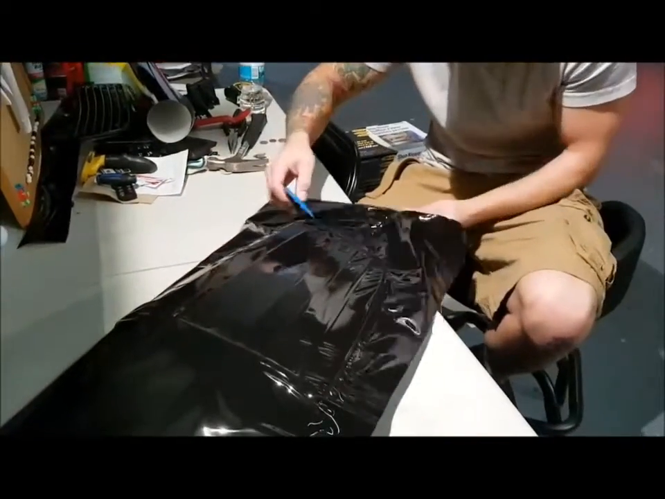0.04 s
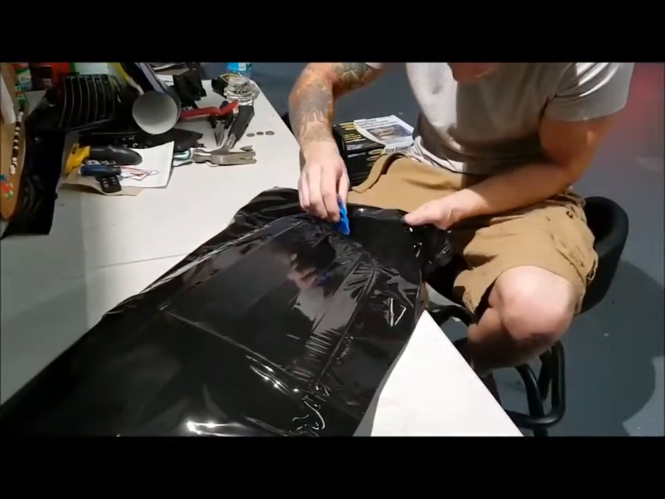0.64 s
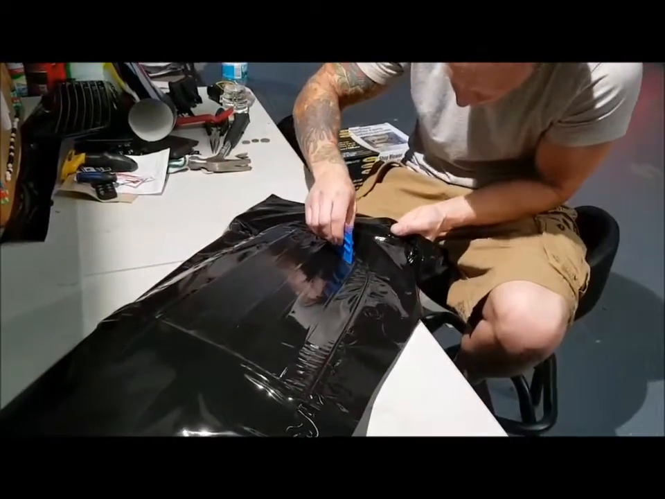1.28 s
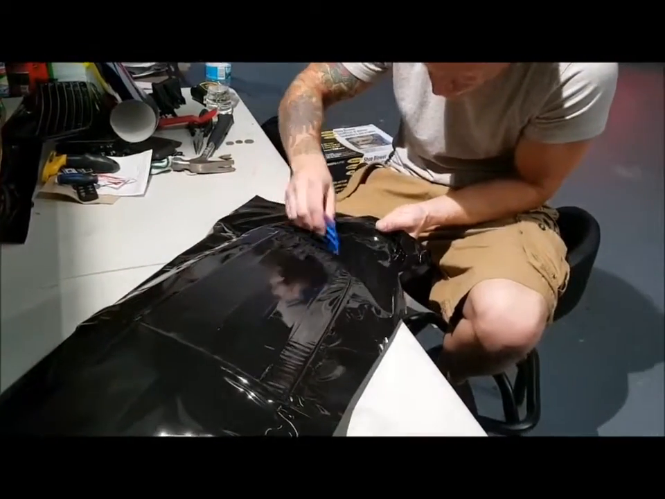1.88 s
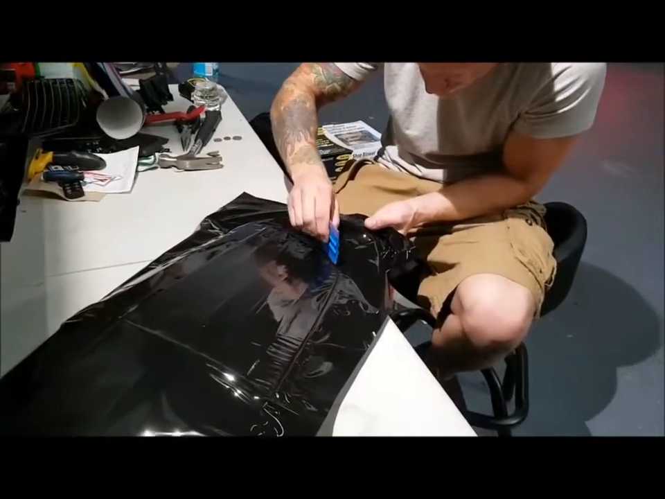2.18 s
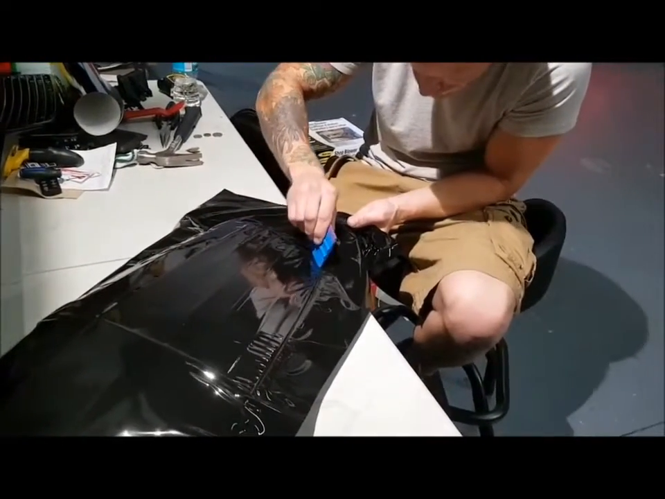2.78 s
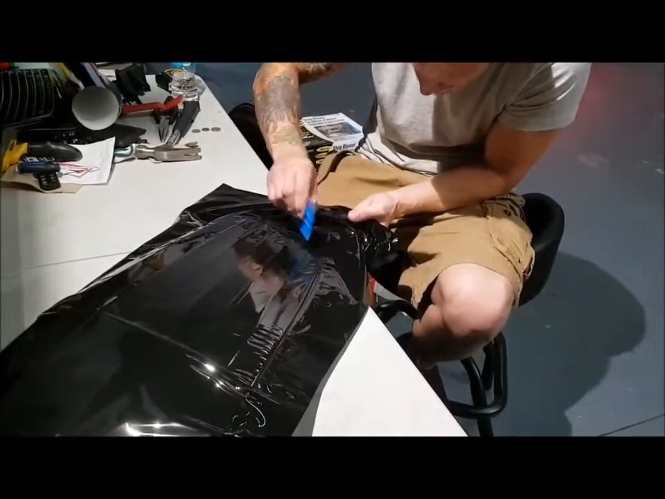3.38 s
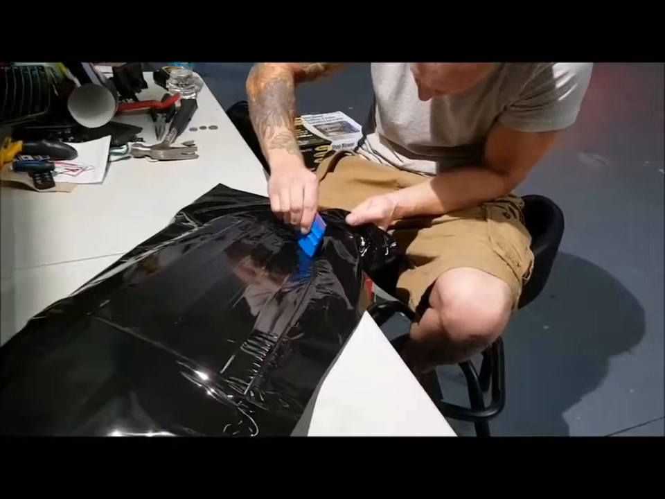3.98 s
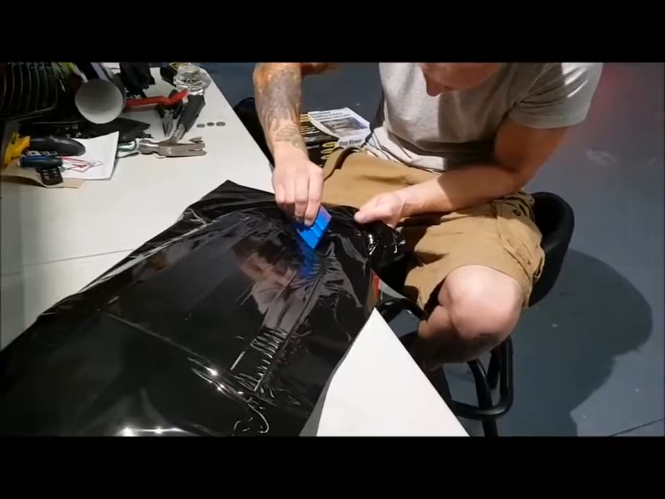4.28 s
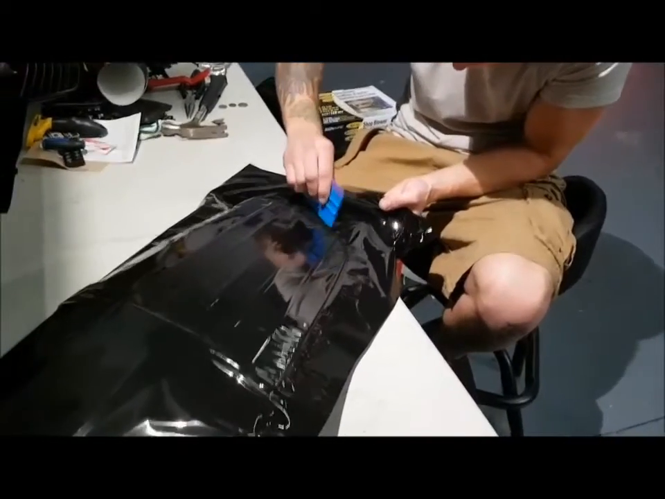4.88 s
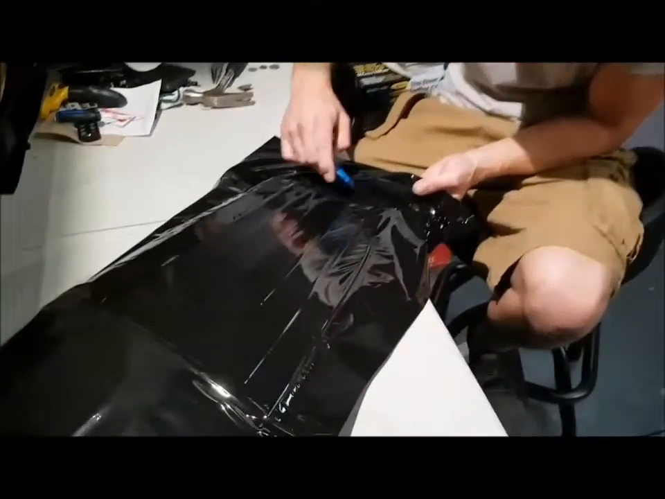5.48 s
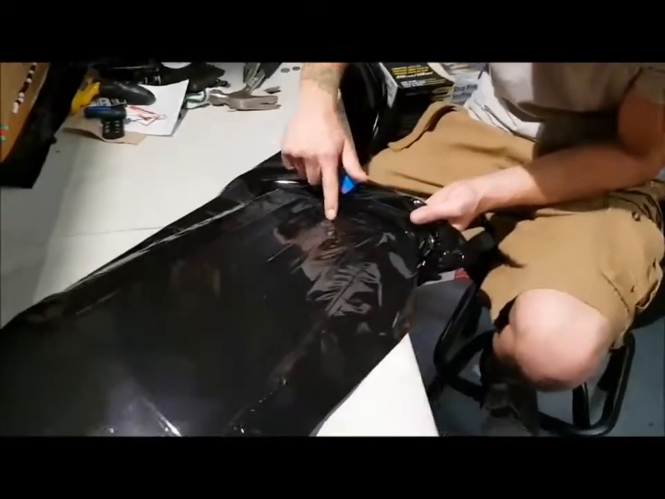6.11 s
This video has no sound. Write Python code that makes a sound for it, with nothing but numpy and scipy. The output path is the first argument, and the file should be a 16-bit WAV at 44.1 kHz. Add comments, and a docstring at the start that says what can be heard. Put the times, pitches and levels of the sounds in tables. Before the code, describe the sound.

Vinyl film hisses and rustles under a scraping squeegee in a garage, popping loudly once among small clicks and dull knocks.

```python
"""A plastic squeegee works loose vinyl film into the recess of a car grille, in a garage.
Countless tiny slips make the blade drag, hiss and rasp; on the hardest stroke it sticks and judders.
Once the taut film buckles into the recess with a loud pop, and the room rings. There are crisp snaps,
dull taps and a tiny squeak; fingers glide, the loose sheet rustles, and the hollow panel knocks,
bumps and hums under the hands. Low ventilation noise lies beneath it all."""
import sys
import numpy as np
from scipy import signal
from scipy.fft import rfft, irfft, next_fast_len
from scipy.io import wavfile
from scipy.ndimage import uniform_filter1d

SR = 44100
rng = np.random.default_rng(int(sys.argv[2]) if len(sys.argv) > 2 else 0)


def wav_out(sig):
    """Save sig, one row per channel (or a flat mono array), as 16-bit PCM at SR to the path in sys.argv[1]."""
    wavfile.write(sys.argv[1], SR, np.round(np.clip(np.atleast_2d(sig).T, -1, 1) * 32767).astype(np.int16))


N = 275617

# Squeegee strokes, speeding up and slowing again. Each row: start, peak and end in seconds,
# then the relative levels of blade drag, film hiss and panel rumble in dB.
STROKES = [(-.3, .1, 0.76, -56, -58, -51.5), (.45, .53, 0.95, -58, -53.5, -73),
           (.5, .8, 1.29, -45.5, -60.5, -50), (1.45, 1.54, 2.2, -57, -59, -67),
           (1.7, 2.3, 2.87, -58.5, -62, -52), (3.54, 4.14, 4.58, -51.5, -52, -51.5),
           (4.15, 4.185, 4.26, -48, -50.5, -67), (4.28, 4.33, 4.4, -61, -58.5, -71),
           (4.3, 4.6, 5.6, -69.5, -73, -56), (5.2, 5.95, 6.5, -59, -59, -54)]


def rubbing():
    """Countless tiny slips: the dull drag of the blade, the hiss of sliding film, its fine crinkle."""
    # Four tone colours. Each row: frequency in Hz, relative level in dB.
    drag_colour = [(120, -10.5), (230, -1), (370, 5.5), (490, -6), (800, 1), (1100, -2), (1400, -3),
                   (1900, -6), (2500, -8), (5000, -53), (15000, -60)]
    hiss_colour = [(400, -26.5), (1200, -5), (1550, -2.5), (1950, -0.5), (2550, 4.5), (3400, -0.5),
                   (4500, 0), (6000, -5.5), (7500, -9), (9000, -24.5), (15000, -63.5)]
    crinkle_colour = [(2000, -32), (6000, 4.5), (9000, -8), (12500, 3.5), (15000, -12)]
    wrinkle_colour = [(400, -13), (1500, 1), (3000, -2), (5000, -4.5), (7000, -6.5), (9000, -25),
                      (15000, -22)]
    # The film is gathered or stretched. Each row: start, peak and end in seconds, level in dB.
    stretches = [(-.2, .13, 1.6, -70), (.45, .51, 0.63, -58), (1.41, 1.55, 1.7, -58.5),
                 (1.95, 2.2, 2.4, -73), (3.5, 3.72, 4, -75), (4.06, 4.18, 4.27, -65), (5.6, 6.1, 7.7, -67)]
    # The hands never quite rest, so each layer keeps a floor between strokes.
    pressing = np.hypot(swell(STROKES, column=3, law=0.41), gain_of(-63))
    sliding = np.hypot(swell(STROKES, column=4, law=0.73), gain_of(-73.5))
    creasing = np.hypot(swell(stretches), sliding * gain_of(-25))
    creasing = np.hypot(creasing, gain_of(-78.5))
    drag = tinted(pair(grains(5000, 1.56)), drag_colour) * pressing * waver(60, 1.9)
    hiss = tinted(pair(grains(12000, 0.57)), hiss_colour) * sliding * waver(35, 1.25) * gain_of(1.12)
    crinkle = tinted(grains(6000, 0.6), crinkle_colour) * creasing * waver(70, 1.1)
    wrinkles = tinted(grains(120, 2.0), wrinkle_colour) * creasing * gain_of(-1.5)
    return drag + hiss + crinkle + wrinkles


def rasping(pocket_hz=636, climb_octaves=1.56):
    """Coarse catches along the groove ring the panel, the blade and a shrinking pocket of air."""
    # Each row: start, peak and end in seconds, relative level in dB.
    scrapes = [(0.502, 0.88, 1.3, -54), (1.958, 2.324, 2.87, -61.5), (3.694, 4.116, 4.45, -53.5)]
    # Panel and blade resonances. Each row: frequency and width in Hz, relative level in dB.
    modes = [(280, 58, -10), (391, 70, -3.5), (850, 140, -6), (2450, 400, -12), (4450, 910, -8.5)]
    out, t = np.zeros((2, N)), np.arange(N) / SR
    catches = pair(grains(700, 3.7)) * waver(45, 1.6)
    body = sum(gain_of(db) * resonate(catches, hz, width) for hz, width, db in modes)
    for scrape in scrapes:
        progress = np.interp(t, [scrape[0], scrape[2]], [0, 1])
        pocket = resonate(catches, pocket_hz * 2 ** (climb_octaves * progress), width_hz=610)
        out += (pocket + body) * swell([scrape])
    return out


def judder(start_hz=640, octaves_per_s=6.5, t60=0.038, q=0.74):
    """The blade sticks and slips on tightening film, so the pitch climbs; each slip rings briefly."""
    # Each row: start in seconds, relative level in dB.
    slips = [(.88, -42), (0.897, -37.5), (0.916, -37), (.935, -30), (.957, -28), (.975, -25.5),
             (.9935, -25.5), (1.017, -29)]
    first, hardest = slips[0][0], max(db for s, db in slips)
    hits = []
    for s, db in slips:
        hz = start_hz * 2 ** (octaves_per_s * (s - first))
        edge_db = -30.5 + 1.6 * (db - hardest)  # harder slips have more bite
        hits.append((s, db, hz, edge_db, 0, t60, q))
    out = flicks(hits, body_trim_db=-1.5, edge_trim_db=-8, direct=0.43, lowpass_hz=2130, edge_length=0.8)
    for s, db in slips:
        for hz, ring_db, ring_t60 in (740, -12.5, 0.016), (1162, -12, 0.036):
            detune = 1 + 0.055 * rng.standard_normal()
            add(out, s, note(hz * detune, ring_t60, db + ring_db))
    return out


def knocks(tick_hz=1750, tick_t60=0.066, tick_q=0.82):
    """The blade taps the panel through the film: a dull tick and always the same hollow note."""
    # Each row: start in seconds, relative level in dB.
    taps = [(.068, -32.5), (1.3, -39), (2.559, -31.5), (2.645, -47)]
    hits = [(s, db, tick_hz, db - 7.5, 0, tick_t60, tick_q) for s, db in taps]
    out = flicks(hits, body_trim_db=-6.5, edge_trim_db=-10, direct=0.11, lowpass_hz=3340, edge_length=1.7)
    for s, db in taps:
        add(out, s, note(hz=512, t60=0.048, db=db - 5))
    return out


def pop(rise_s=0.00031):
    """The film buckles into the recess in quick cracking steps, and the taut sheet rings."""
    # Each row: start in seconds, relative level in dB.
    steps = [(1.5598, -7.5), (1.562, -2), (1.564, 2), (1.5654, -2), (1.574, -6.5)]
    # Each row: frequency in Hz, relative level in dB.
    crack_colour = [(80, -19.5), (230, -10), (340, -20.5), (520, -10.5), (800, -14), (1300, -6.5),
                    (2050, 0), (2900, -12), (4200, -11.5), (6000, -14.5), (8500, -29), (14500, -31.5)]
    # Each row: frequency in Hz, relative level in dB, seconds to fall 60 dB.
    film_modes = [(800, -9.5, 0.044), (1120, -10.5, 0.11), (1170, -10, 0.048), (1407, -8.5, 0.1),
                  (1690, -0.5, 0.031), (1908, 1.5, 0.034), (2198, 2, 0.041), (2490, -1.5, 0.043),
                  (2810, -6, 0.046), (3460, -9.5, 0.023), (4340, -6.5, 0.026), (4330, -16.5, .03)]
    out, t = np.zeros((2, N)), np.arange(8192) / SR
    for s, db in steps:
        pulse, hz = burst(t60=0.019, direct=0.19)
        crack = causal(pulse, gain_of(read(crack_colour, hz)))
        add(out, s, at_level(crack, db - 17.5))
    phases = rng.uniform(0, 2 * np.pi, (len(film_modes), 1, 1))
    phases = phases + rng.normal(0, 0.82, (len(film_modes), 2, 1))  # stereo width
    ring = sum(gain_of(db - 60 * t / t60) * np.sin(2 * np.pi * hz * t + phase)
               for (hz, db, t60), phase in zip(film_modes, phases))
    attack = 1 - np.exp(-t / rise_s)
    add(out, steps[1][0], at_level(ring * attack, -14))
    return out


def snaps_and_taps(ref_db=-20, ref_t60=0.025, halving_db=8.5):
    """Crisp snaps, a few dull taps and one tiny squeak, each ringing briefly; louder ones are shorter."""
    # Each row: start in seconds, body level in dB, body pitch in Hz, body Q, edge level in dB,
    # ring pitch in Hz, ring level in dB, top-end fizz in dB. All levels are relative.
    events = [(.025, -40, 1500, 1.6, -41.5, 1510, -50, 0), (.047, -40, 1800, 1.2, -46, 1780, -52, 5),
              (.1205, -43, 530, 1.3, -39.5, 440, -36, 6), (.1285, -38, 450, 1.7, -36.5, 980, -54, -1),
              (.176, -28, 1000, 0.58, -32, 1825, -28, 3), (0.2012, -30, 1550, 2.5, -32, 1455, -29, 0),
              (.32, -32.5, 1040, 0.64, -39.5, 2230, -36, 9), (.356, -30.5, 1310, 1.5, -37.5, 1740, -32, 9),
              (.381, -50, 2000, 1.2, -45, 2000, -49.5, 13), (.471, -33, 2400, 1.4, -47, 2274, -46, -1),
              (.497, -32, 1460, 0.64, -40, 1420, -57, 12), (.505, -28.5, 1940, 1.3, -33, 990, -49, 7),
              (0.54, -32.5, 1000, 1.4, -37, 1390, -46, 8),
              (1.1469, -22.5, 2740, 4.5, -27.5, 1320, -25.5, 1.5),
              (1.1504, -20, 1530, 0.69, -33, 1135, -29.5, 0),
              (1.1714, -18, 2370, 1.45, -24, 2250, -24.5, -17), (1.547, -33.5, 1090, 1.4, -42, 706, -37, 5),
              (2.211, -37.5, 2630, 3.9, -53, 1660, -45, 0), (3.21, -42.5, 1690, 0.74, -56, 1650, -54, -2.5),
              (3.687, -39, 1900, .8, -47, 2580, -47, -7), (4.281, -55, 2600, 1, -59, 8200, -48, 0),
              (5.099, -31, 660, 1.44, -63, 1120, -37, -10), (5.608, -32, 1900, 0.84, -38, 2310, -36.5, -6),
              (5.623, -41, 2500, 1, -54, 2310, -52, 0), (5.661, -36, 800, 0.9, -47, 1486, -42, -12)]
    hits = []
    for s, db, hz, q, edge_db, _, _, fizz_db in events:
        t60 = ref_t60 * 2 ** ((ref_db - db) / halving_db)
        hits.append((s, db, hz, edge_db, fizz_db, t60, q))
    out = flicks(hits, body_trim_db=-7, edge_trim_db=-3, direct=0.18, lowpass_hz=4000, edge_length=0.65)
    for s, *_, ring_hz, ring_db, _ in events:
        add(out, s, note(ring_hz, t60=0.039, db=ring_db - 11))
    return out


def flicks(hits, body_trim_db, edge_trim_db, direct, lowpass_hz, edge_length):
    """Each slip, tap or snap on the film rings one resonance and gives a crisp edge."""
    # Each row: frequency in Hz, relative level in dB.
    edge_colour = [(400, 0), (1500, 0.5), (2800, -1.5), (5000, 0.5), (7000, -12.5), (9000, -24.5),
                   (15000, -24)]
    out = np.zeros((2, N))
    for s, body_db, body_hz, edge_db, fizz_db, t60, q in hits:
        spike = direct * 0.032 / max(t60, 0.008)  # shorter hits put more into the first pulse
        pulse, hz = burst(t60 / np.sqrt(max(q / 2, 1)), spike)  # a sharp resonance adds its own decay
        detune = (hz + 1) / body_hz - body_hz / (hz + 1)
        body = causal(pulse, 1 / np.sqrt((1 + (q * detune) ** 2) * (1 + (hz / lowpass_hz) ** 4)))
        pulse, hz = burst(t60 * edge_length, spike)
        shelf_db = np.interp(hz, [3000, 8800], [0, fizz_db])
        edge = causal(pulse, gain_of(read(edge_colour, hz) + shelf_db))
        add(out, s, at_level(body, body_db + body_trim_db) + at_level(edge, edge_db + edge_trim_db))
    return out


def bumps(t60=0.11, rise_s=0.0052):
    """The hands bump the hollow panel: low, quickly damped swings with a weaker second mode."""
    # Each row: start in seconds, relative level in dB, pitch in Hz.
    thumps = [(0.299, -35.5, 95.4), (0.496, -40.5, 130), (1.007, -33.5, 205), (1.149, -38, 210),
              (1.171, -43.5, 331.4), (1.562, -23.5, 108.7), (1.646, -37, 126), (1.901, -38, 90),
              (3.606, -40, 140), (4.029, -43, 132), (4.199, -43, 154), (4.481, -47, 199.3),
              (4.814, -47.5, 248), (5.066, -33, 91.7), (5.101, -48.5, 374), (5.306, -37, 108),
              (5.669, -31.5, 114), (5.851, -46.5, 252), (5.913, -34, 156), (6.085, -36.5, 112)]
    out, t = np.zeros((2, N)), np.arange(SR // 3) / SR
    attack = 1 - np.exp(-t / rise_s)
    for s, db, hz in thumps:
        swing = np.sin(2 * np.pi * hz * t) + 0.3 * np.sin(2 * np.pi * hz * 1.39 * t)
        decay = gain_of(db + 1 - 60 * t / t60)
        add(out, s, np.tile(swing * attack * decay, (2, 1)))
    return out


def finger_glides():
    """Fingers glide over the film in a bright whisper of fine, unsteady slips."""
    # Each row: start, peak and end in seconds, level in dB.
    glides = [(1.412, 1.425, 1.64, -50.5), (3.195, 3.215, 3.4, -63), (3.6, 4.1, 4.1, -62),
              (5.72, 6.07, 6.44, -57.5)]
    # Each row: frequency in Hz, relative level in dB.
    colour = [(500, -12), (1500, -4.5), (1850, -6), (2100, -3.5), (2500, -1.5), (3400, -10.5), (4200, -5),
              (4600, -1.5), (5400, -6), (6200, -12), (7300, -11), (9000, -21), (15000, -20.5)]
    return tinted(pair(grains(9000, 0.64)), colour) * swell(glides) * waver(40, 2.3)


def sheet_flexing():
    """The loose sheet flexes with a low, uneven rustle."""
    # Each row: start, peak and end in seconds, level in dB.
    flexes = [(1.8, 1.98, 2.14, -54), (3.75, 4.03, 4.06, -51), (4.465, 4.487, 4.57, -52),
              (4.8, 4.825, 5, -56), (5.29, 5.315, 5.37, -51.5), (5.65, 5.675, 5.72, -54),
              (5.8, 5.85, 5.99, -57), (6.02, 6.08, 6.2, -50), (1.935, 1.955, 1.985, -39.5)]
    # Each row: frequency in Hz, relative level in dB.
    colour = [(90, -20.5), (160, -11), (230, 3.5), (300, -3), (375, -2.5), (500, -14), (900, -16),
              (3000, -51)]
    return tinted(pair(grains(9000, 0.64)), colour) * swell(flexes) * waver(40, 3.5)


def panel_hum():
    """A slow, even stroke keeps a low note of the panel humming."""
    # Each row: start, peak and end in seconds, level in dB.
    hums = [(2.03, 2.27, 2.47, -52), (3.6, 4.0, 4.45, -53.5)]
    return resonate(pair(grains(700, 1.5)), hz=158, width_hz=22) * swell(hums, law=0.5)


def panel_rumble():
    """The hollow panel rumbles unevenly under each stroke, and faintly in between."""
    # Each row: frequency in Hz, relative level in dB.
    colour = [(35, -13), (65, -11), (95, 1), (130, -1.5), (165, 0), (205, -8.5), (300, -15), (600, -31),
              (3000, -85)]
    shaking = np.hypot(swell(STROKES, column=5, law=0.49), gain_of(-60.5))
    return tinted(pair(rng.standard_normal((2, N))), colour) * shaking * waver(18, 1.85) * gain_of(-2)


def ventilation():
    """Steady low noise of moving air."""
    # Each row: frequency in Hz, relative level in dB.
    colour = [(15, -5.5), (30, -13), (45, -10), (58, 6.5), (75, -1.5), (130, -2.5), (220, -17), (450, -17),
              (950, -19.5), (1500, -23), (4000, -34), (9000, -51), (15000, -39)]
    return tinted(pair(rng.standard_normal((2, N))), colour) * gain_of(-54.5)


def near_reflections(x):
    """Echoes off worktop and panel: their paths change as the hands travel, so the colour shifts."""
    # Each row: left and right delay in seconds, share of the pressure.
    echoes = [(.0019, .0018, 0.35), (.0037, .0041, 0.26), (0.0121, .0109, .14)]
    out, n = x.copy(), np.arange(N)
    for left, right, share in echoes:
        stretch = waver(per_s=5, depth_db=1)
        for side, delay in enumerate((left, right)):
            out[side] += share * np.interp(n - delay * SR * stretch, n, x[side])
    return out


def wall_reflections(x):
    """Ceiling and walls add distinct, slightly duller echoes."""
    # Each row: left and right delay in seconds, share of the pressure.
    echoes = [(0.0255, 0.034, 0.084), (0.0285, 0.024, 0.11), (.0805, .0815, .04)]
    out, dull = x.copy(), uniform_filter1d(x, size=3, axis=1)
    for left, right, share in echoes:
        add(out[:1], left, share * dull[:1])
        add(out[1:], right, share * dull[1:])
    return out


def garage(x, wet_db, fade_in_s=0.005):
    """A diffuse tail from hard walls, the top treble dying first."""
    # Each row: frequency in Hz, seconds to fall 60 dB.
    decay_times = [(100, 2), (400, 0.9), (1500, 1.0), (3500, 1.11), (5500, 1.36), (8000, 1.03),
                   (14000, 0.19)]
    # Each row: frequency in Hz, relative level in dB.
    colour = [(100, 3.5), (400, 3), (1300, 4.5), (2200, -2.5), (3000, -1), (5000, -3.5), (14000, 1.2)]
    hz, t, bands = signal.stft(pair(rng.standard_normal((2, SR))), SR, nperseg=256)
    bands *= gain_of(read(colour, hz)[:, None] - 60 * t / read(decay_times, hz)[:, None])
    fade_in = np.clip(np.arange(SR) / SR / fade_in_s - 0.5, 0, 1)
    tail = signal.istft(bands, SR, nperseg=256)[1][:, :SR] * fade_in
    return gain_of(wet_db) * signal.fftconvolve(x, tail / np.linalg.norm(tail[0]), axes=1)[:, :N]


def grains(per_s, spread_db):
    """Tiny slips at random moments, most small and a few large."""
    sizes = gain_of(spread_db * np.minimum(rng.exponential(1, N), 4))
    return unit_rms(rng.standard_normal((2, N)) * sizes * (rng.random(N) < per_s / SR))


def burst(t60, direct, size=4096):
    """A sharp pulse and the dense scatter that follows it through the sheet; also its frequency axis."""
    t, hz = np.arange(size) / SR, np.fft.rfftfreq(size, 1 / SR)
    scatter = pair(rng.standard_normal((2, size))) * gain_of(-60 * t / max(t60, 0.003))
    scatter /= np.linalg.norm(scatter, axis=1, keepdims=True)
    scatter[:, 0] += direct
    power = (abs(rfft(scatter)) ** 2).mean(0)
    broad_shape = np.sqrt(uniform_filter1d(power, size=70))
    return causal(scatter, 1 / broad_shape), hz  # even across broad bands, ragged within them


def note(hz, t60, db):
    """One dying note, centred."""
    t = np.arange(SR // 8) / SR
    ring = np.sin(2 * np.pi * hz * t) * gain_of(-60 * t / t60)
    return at_level(np.tile(ring, (2, 1)), db)


def resonate(x, hz, width_hz):
    """A steady or moving resonance: shifts hz down to zero, smooths twice, and shifts back."""
    carrier = np.exp(2j * np.pi * np.cumsum(hz * np.ones(x.shape[1])) / SR)
    pole = np.exp(-np.pi * width_hz / SR)
    smoothed = signal.lfilter([(1 - pole) ** 2], [1, -2 * pole, pole * pole], x / carrier)
    return unit_rms((carrier * smoothed).real)


def swell(rows, column=3, law=1):
    """Gain of gestures that rise to the dB level in a column and fall; it follows speed ** law."""
    t = np.arange(N) / SR
    gestures = (gain_of(row[column]) * np.interp(t, row[:3], [0, 1, 0]) ** law for row in rows)
    return np.sqrt(sum(gesture ** 2 for gesture in gestures))


def waver(per_s, depth_db):
    """A factor that wanders randomly around 1."""
    knots = rng.standard_normal(4000)
    return gain_of(depth_db * np.interp(np.arange(N) / SR * per_s, np.arange(len(knots)), knots))


def pair(x):
    """Two unrelated signals become diffuse stereo: alike in the bass, wide in the treble."""
    # Each row: frequency in Hz, left-right likeness from -1 to 1.
    likeness = [(60, 1), (130, 0.98), (290, 0.84), (640, 0.75), (1400, -0.41), (3000, 0.12), (15000, -0.17)]
    spectra = rfft(x)
    alike = read(likeness, np.fft.rfftfreq(x.shape[1], 1 / SR))
    mid, side = spectra[0] * np.sqrt((1 + alike) / 2), spectra[1] * np.sqrt((1 - alike) / 2)
    return irfft(np.array([mid + side, mid - side]), x.shape[1])


def tinted(x, colour):
    """Gives a long signal a tone colour, at rms 1."""
    size = next_fast_len(N)
    gain = gain_of(read(colour, np.fft.rfftfreq(size, 1 / SR)))
    return unit_rms(irfft(rfft(x, size) * gain, size)[:, :N])


def causal(x, gain):
    """Filters a short burst at minimum phase, so nothing sounds before its onset."""
    log_gain = np.log(np.maximum(gain, 1e-5))
    mirrored = np.concatenate([log_gain, log_gain[-2:0:-1]])
    return irfft(rfft(x) * np.exp(np.conj(signal.hilbert(mirrored)))[:len(gain)])


def read(points, hz):
    """Reads a table on a log-frequency axis."""
    freqs, values = np.transpose(points)
    return np.interp(np.log(hz + 1), np.log(freqs + 1), values)


def at_level(x, db):
    """Sets the energy of a hit to that of 3 ms at this level."""
    return x * gain_of(db) * np.sqrt(0.003 * SR / (x ** 2).mean(0).sum())


def unit_rms(x):
    """Scales to rms 1."""
    return x / np.sqrt(np.mean(x ** 2) + 1e-20)


def gain_of(db):
    """Decibels to amplitude."""
    return 10 ** (np.asarray(db) / 20)


def add(mix, s, sound):
    """Mixes a sound in at s seconds."""
    part = mix[:, max(round(s * SR), 0):][:, :sound.shape[1]]
    part += sound[:, :part.shape[1]]


def scene():
    """All the work on the film, in the room."""
    sliding = rubbing() + finger_glides() + sheet_flexing()
    work = snaps_and_taps() + knocks() + judder() + bumps() + rasping() + panel_hum()
    work += gain_of(-1.2) * near_reflections(sliding)
    loud_pop = pop()
    # The pop spreads to both sides of the room.
    room = garage(loud_pop, wet_db=-14.5) + garage(loud_pop[::-1], wet_db=-14.5)
    room += garage(work, wet_db=-14)
    return work + wall_reflections(loud_pop) + room + panel_rumble() + ventilation()


def record(dry, cutoff_hz=14850):
    """The two microphone ports colour the treble differently; a steep low-pass trims the top."""
    # Each row: frequency in Hz, left minus right in dB.
    balance = [(200, 0), (330, -2.5), (1000, -0.8), (1800, -1), (2900, -5.5), (4600, -4.5), (5800, -8),
               (7500, 0.5), (9700, 9), (12500, 1.7), (15000, 1)]
    size = next_fast_len(N)
    lean = gain_of(read(balance, np.fft.rfftfreq(size, 1 / SR)))
    ports = np.array([lean, np.ones_like(lean)]) * np.sqrt(2 / (1 + lean ** 2))
    heard = irfft(rfft(dry, size) * ports, size)[:, :N]
    lowpass = signal.firwin(401, cutoff_hz, window=("kaiser", 8), fs=SR)
    return signal.oaconvolve(heard, lowpass[None], "same")


dry = scene()
out = record(dry)
wav_out(out)
```